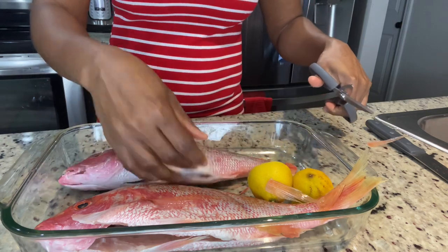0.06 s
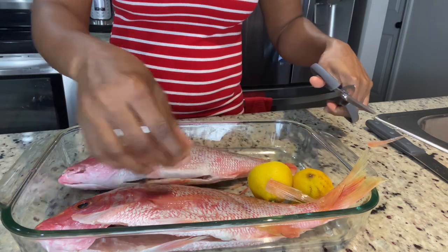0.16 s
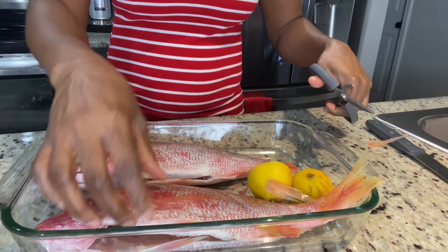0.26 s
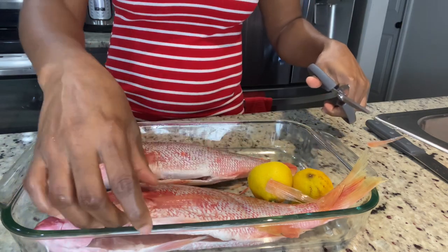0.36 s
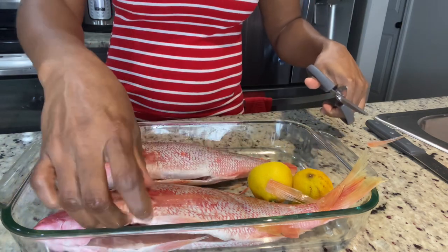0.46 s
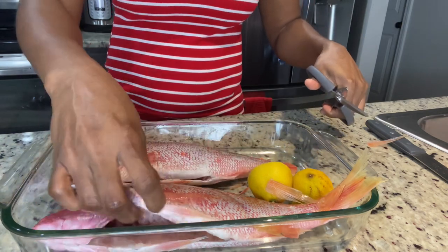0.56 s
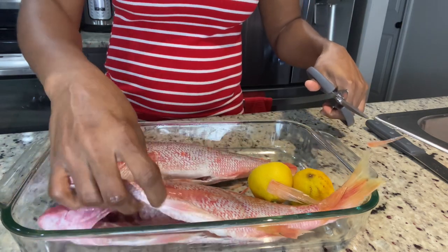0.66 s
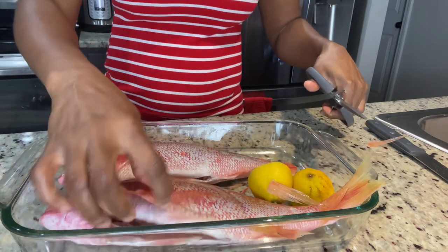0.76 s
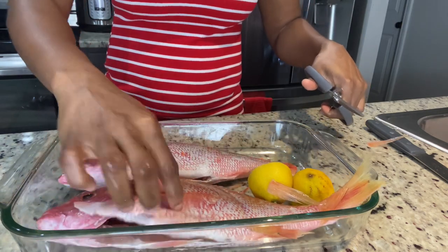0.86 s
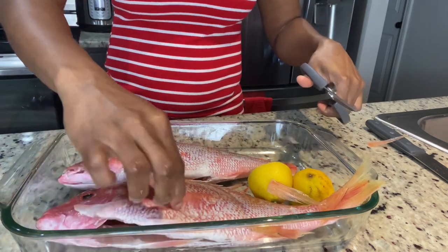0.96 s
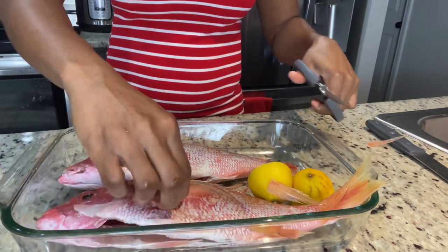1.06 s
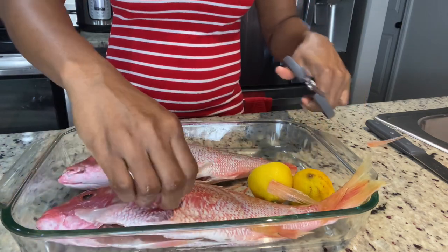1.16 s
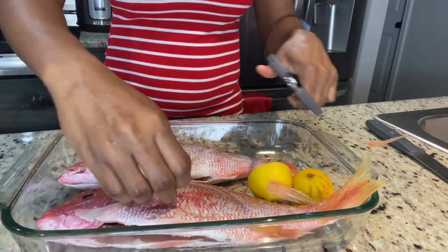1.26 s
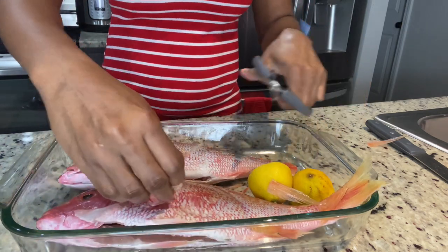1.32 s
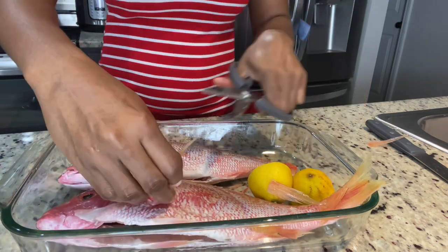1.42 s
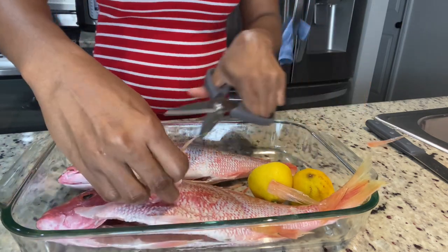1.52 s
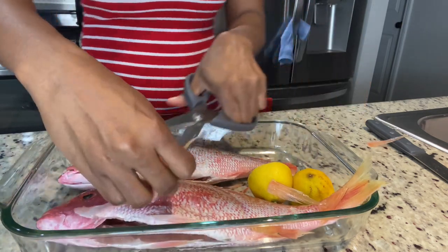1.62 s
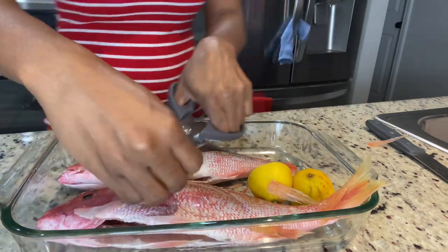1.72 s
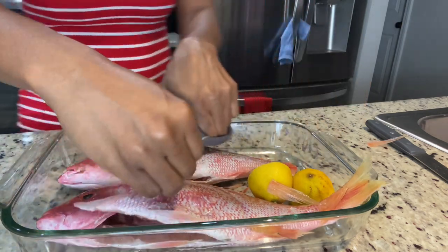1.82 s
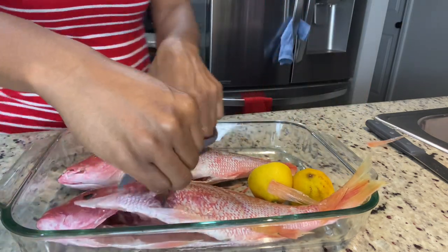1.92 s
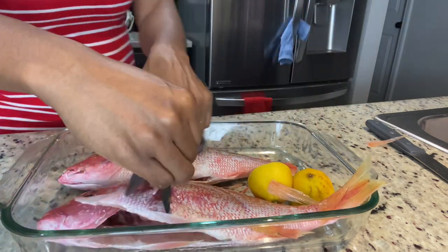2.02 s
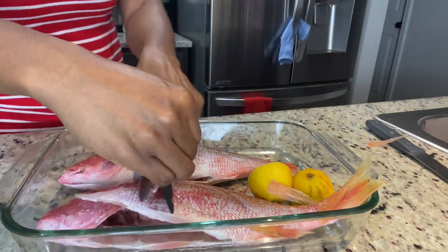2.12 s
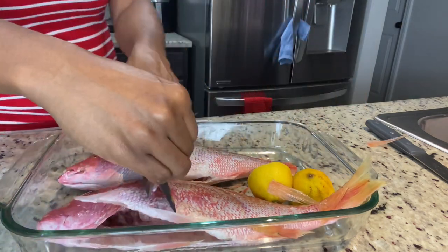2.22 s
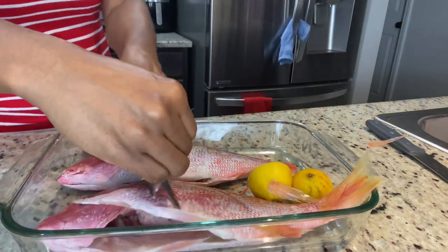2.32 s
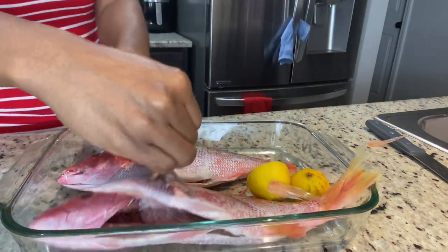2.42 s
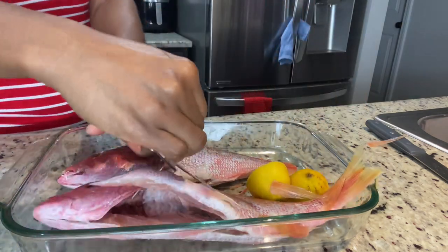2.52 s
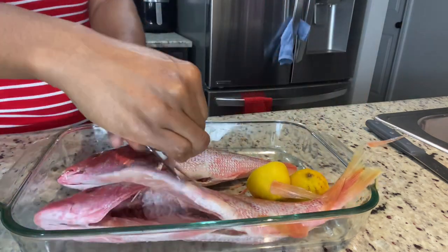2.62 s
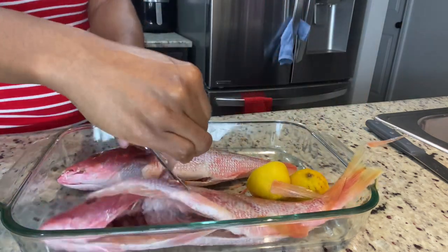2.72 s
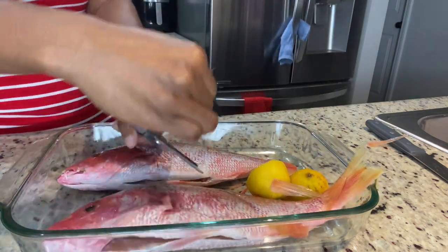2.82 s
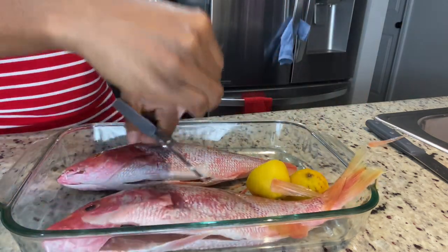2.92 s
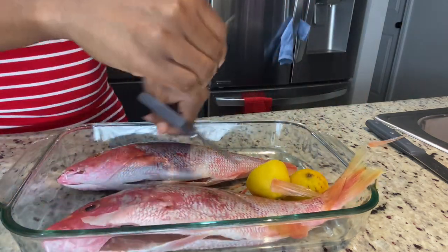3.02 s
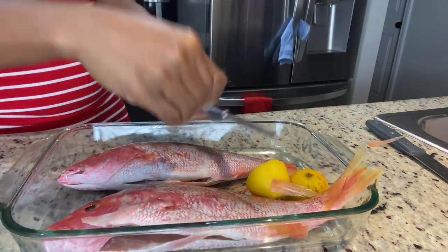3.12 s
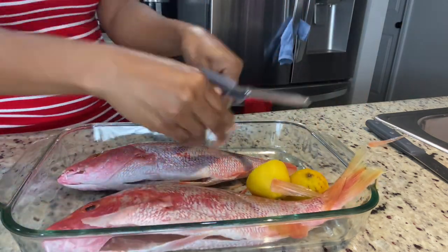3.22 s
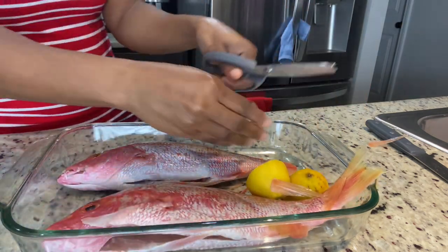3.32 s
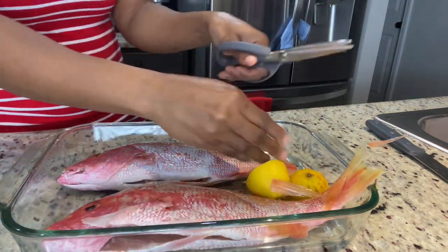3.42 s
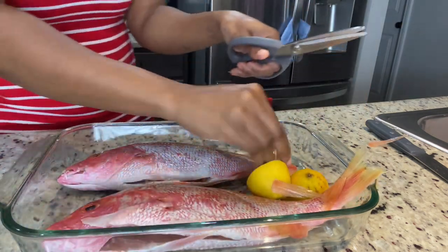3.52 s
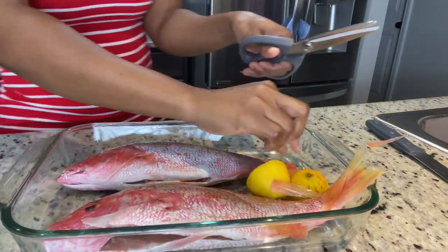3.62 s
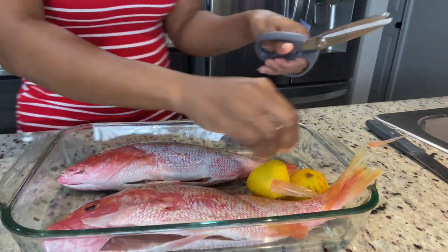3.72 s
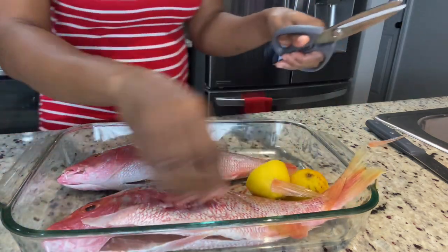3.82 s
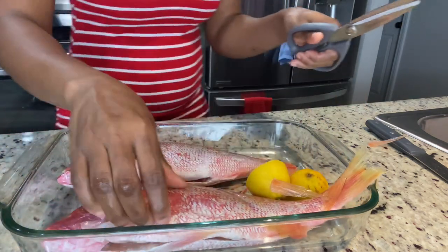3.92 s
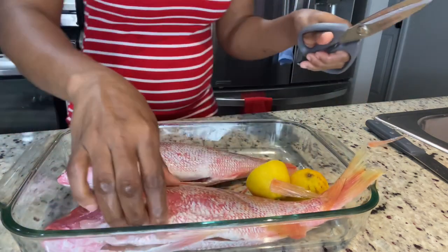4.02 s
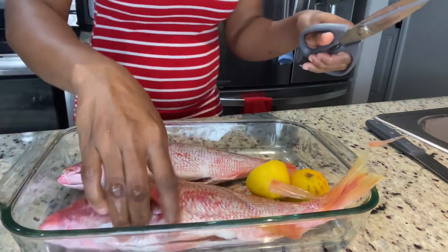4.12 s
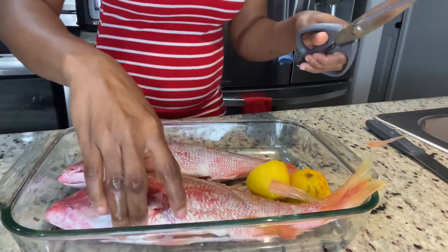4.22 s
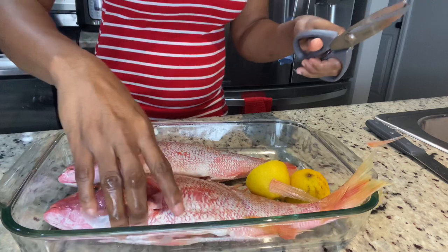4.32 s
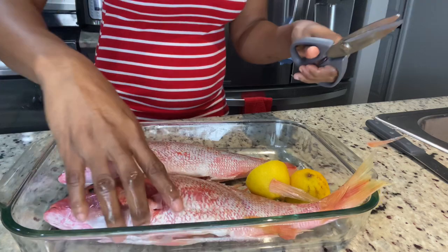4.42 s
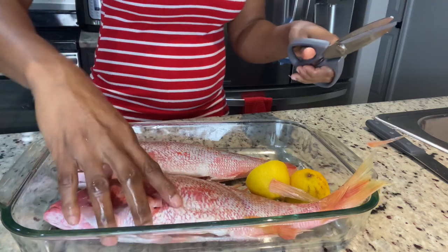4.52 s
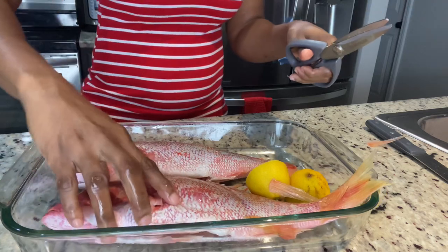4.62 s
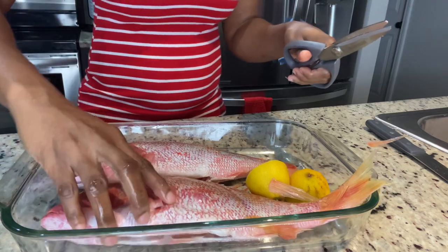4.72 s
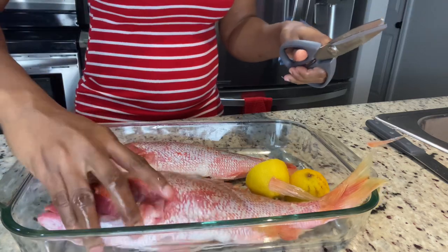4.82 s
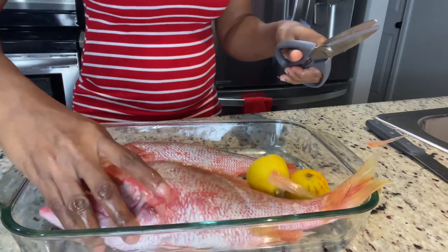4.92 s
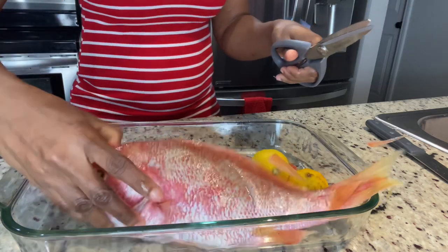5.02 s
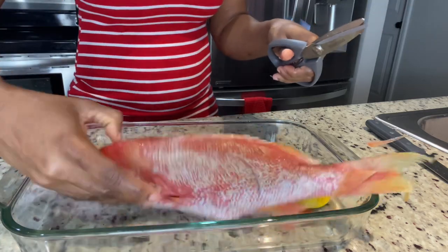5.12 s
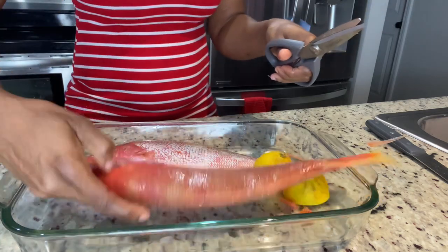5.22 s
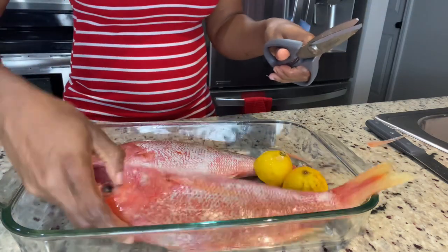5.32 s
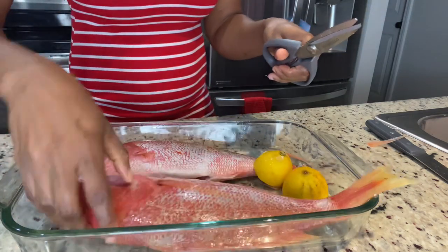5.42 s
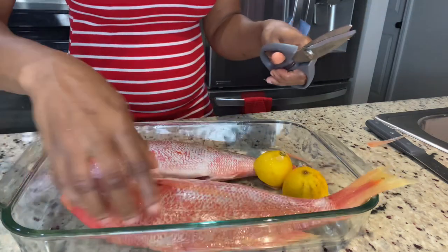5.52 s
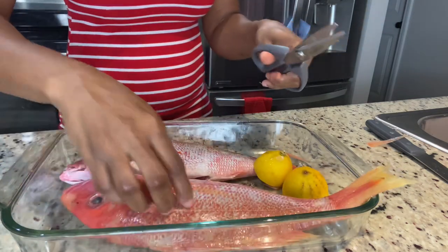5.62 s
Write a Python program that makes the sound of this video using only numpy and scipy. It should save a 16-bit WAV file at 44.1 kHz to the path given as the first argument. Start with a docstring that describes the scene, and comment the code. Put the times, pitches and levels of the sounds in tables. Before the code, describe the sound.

Wet fish skin squishes and scales tick softly while a glass dish bumps lightly on a stone counter. Kitchen shears then make one crisp, crunchy cut through a fin, followed at once by two loud, ringing glass knocks with low thuds. More quiet, slippery handling leads to a last squelch and knock as the fish lands. The microphone is close, in a hard-walled kitchen with a faint fridge hum.

```python
"""A glass dish knocks and rocks on a stone counter as hands turn wet fish in it and shears cut one fin.
Each knock sets glass and stone ringing, and the flesh lands with low thuds. The blades grind and the
fin rays snap; scales tick, and wet skin hisses and squelches under the fingers.
It all plays close up, in a hard-walled kitchen where a fridge hums."""
import sys
import numpy as np
from scipy import signal
from scipy.fft import rfft, irfft
from scipy.io import wavfile
from scipy.ndimage import uniform_filter1d

SR = 44100
rng = np.random.default_rng(int(sys.argv[2]) if len(sys.argv) > 2 else 0)


def transcribe(signal):
    """Save signal, clipped to [-1, 1], as a 16-bit WAV file at the path in sys.argv[1]."""
    frames = np.atleast_2d(signal).T
    limited = np.clip(frames, -1, 1)
    pcm = np.round(limited * 32767).astype(np.int16)
    wavfile.write(sys.argv[1], SR, pcm)


N = 249708


def undb(db):
    """Gain for a level in dB."""
    return 10 ** (np.asarray(db) / 20)


def unit(x):
    """Scales x to rms 1."""
    return x / np.sqrt(np.mean(x ** 2))


def band(x, hz, octaves, order=2):
    """Band-pass around hz."""
    edges = np.minimum(hz * 2 ** (np.array([-.5, .5]) * octaves), SR * np.array([.44, .48]))
    return signal.sosfilt(signal.butter(order, edges, "band", fs=SR, output="sos"), x)


def rolloff(x, hz, kind="low", order=2):
    """Low-pass or high-pass with its corner at hz."""
    return signal.sosfilt(signal.butter(order, hz, kind, fs=SR, output="sos"), x)


def equalise(x, curve):
    """Colours x along a curve of (Hz, dB) points."""
    hz, db = np.transpose(curve)
    freqs = np.maximum(np.fft.rfftfreq(x.shape[-1], 1 / SR), 1)
    return irfft(rfft(x) * undb(np.interp(np.log(freqs), np.log(hz), db)), x.shape[-1])


def fade(t60, seconds):
    """Exponential decay, 60 dB down after t60 seconds."""
    return np.exp(-np.log(1000) * np.arange(int(seconds * SR)) / SR / max(t60, .002))


def add(out, start, x):
    """Mixes x into out from start, in seconds."""
    i = int(start * SR)
    out[..., i:i + x.shape[-1]] += x[..., :N - i]


def place(x, pan_db, lag):
    """Stereo position: the left is pan_db louder, the right comes lag samples later."""
    return np.array([x * undb(pan_db / 2), np.roll(x, lag) * undb(-pan_db / 2)])


def wander(per_s):
    """Drift of rms 1, gliding to a new random value per_s times a second."""
    step = int(SR / per_s)
    return unit(uniform_filter1d(np.repeat(rng.standard_normal(N // step + 1), step), step)[:N])


def grains(per_s, spread_db):
    """Random clicks with a long tail of sizes, rms 1."""
    hit = rng.random(N) < per_s / SR
    return unit(hit * rng.standard_normal(N) * undb(spread_db * rng.exponential(size=N)))


def ring(modes, seconds, variation=1):
    """Stereo ring of a struck body; each blow varies the level, phase and pitch of its modes."""
    t = np.arange(int(seconds * SR)) / SR
    hz, db, t60 = np.transpose(modes)[:, :, None]
    level_jitter, phase_jitter, pitch_jitter = variation * rng.standard_normal((len(hz), 3)).T[..., None]
    hz = hz * (1 + .0047 * pitch_jitter)
    envelope = undb(db + 1.5 * level_jitter) * np.exp(-np.log(1000) * t / t60) * np.minimum(t / .0022, 1)
    right_lag_s = .00015
    phase = np.pi * hz * right_lag_s + .72 * np.minimum(hz / 700, 1) * phase_jitter  # bass stays narrow
    return np.array([np.sum(envelope * np.sin(2 * np.pi * hz * t + k * phase), axis=0) for k in (1, -1)])


def fridge():
    """The motor hums in wavering tones, the higher ones wider in stereo."""
    # Each row: pitch in Hz, level in dB.
    tones = [(177.6, -71.5), (253.0, -87), (414.5, -93.5), (592.2, -81.5), (769.8, -82), (829.0, -75.5),
             (5120, -94), (7150, -91.5)]
    t = np.arange(N) / SR
    hum = np.zeros((2, N))
    for hz, db in tones:
        level = np.sqrt(2) * undb(db + 3.3 * wander(4.2))
        stereo_phase = np.array([[0], [min(hz / 400, 2)]])
        hum += level * np.sin(2 * np.pi * hz * t + 1.5 * wander(23) + stereo_phase)
    return hum


def room_tone():
    """A soft bed of air noise, mostly low rumble."""
    # Each row: frequency in Hz, relative level in dB.
    colour = [(18, -31.5), (30, 0), (179, -8), (336, -6.5), (512, -19.5), (822, -16.5), (913, -22.5),
              (1390, -32), (5900, -40.5), (7270, -34), (9220, -37), (10200, -64.5), (11700, -39),
              (13300, -45), (16000, -71)]
    # Each row: frequency in Hz, likeness of left and right from 0 to 1.
    stereo_likeness = [(60, 0.41), (130, 0.94), (290, 0.71), (640, 0.37), (1410, 0.62), (3100, 0.45),
                       (6820, 1), (15000, 1)]
    hz, likeness = np.transpose(stereo_likeness)
    freqs = np.maximum(np.fft.rfftfreq(N, 1 / SR), 1)
    likeness = np.clip(np.interp(np.log(freqs), np.log(hz), likeness), -.95, .95)
    mid, side = (irfft(rfft(rng.standard_normal(N)) * np.sqrt(1 + k * likeness), N) for k in (1, -1))
    air = unit(equalise(np.array([mid + side, mid - side]), colour))
    return undb(-64 + .2 * wander(4.1)) * air


def kitchen_reverb(send):
    """Hard walls return a short tail that dies band by band, narrower in the bass."""
    # Each row: band centre in Hz, t60 in seconds.
    decays = [(150, 0.44), (500, 0.29), (1500, 0.49), (4000, 0.15), (10000, 0.12)]
    t = np.arange(int(.6 * SR)) / SR
    tail = np.zeros((2, len(t)))
    for hz, t60 in decays:
        width = min(hz / 450, 1)
        noise = np.array([[1, width], [1, -width]]) @ rng.standard_normal(tail.shape) / np.hypot(1, width)
        tail += fade(t60, .6) * band(noise, hz, 3.04, order=1)
    tail *= np.clip((t - .004) / .0048, 0, 1)  # pre-delay, then fade-in
    tail /= np.sqrt(np.sum(tail[0] ** 2))
    return signal.fftconvolve(send.mean(axis=0)[None], tail, axes=1)[:, :N]


def finger_pressure(gestures):
    """Envelope of the grip: each gesture swells, holds and lets go."""
    attack_s, swell_share, release_t60 = .023, .28, .076
    pressure = np.zeros(N)
    for start, length, db in gestures:
        t = np.arange(int(length * SR)) / SR
        held = np.minimum(t / max(attack_s, swell_share * length), 1)
        add(pressure, start, undb(db) * np.concatenate([held, held[-1] * fade(release_t60, .3)]))
    return pressure


def wet_skin():
    """Sliding fingers raise a grainy hiss and squish; wet pockets pop as flesh is gripped or lands."""
    # Each row: start in seconds, length in seconds, hiss in dB, squish in dB.
    strokes = [(0.007, 0.016, -56, -68.5), (0.482, 0.015, -74, -67), (0.522, 0.035, -65, -69),
               (0.594, 0.07, -73.5, -71), (0.939, 0.02, -62, -98), (1.033, 0.047, -59.5, -95),
               (1.09, 0.065, -65.5, -95), (1.316, 0.086, -70, -77.5), (1.402, 0.092, -64, -75),
               (1.603, 0.19, -77.5, -74), (1.861, 0.36, -64.5, -69.5), (2.218, 0.022, -60, -60),
               (2.323, 0.056, -71, -73), (2.385, 0.054, -64.5, -77), (3.578, 0.022, -72.5, -79),
               (3.87, 0.17, -72, -77.5), (3.994, 0.372, -68.5, -72.5), (4.293, 0.14, -68.5, -91),
               (4.75, 0.072, -86, -78.5), (4.844, 0.18, -64, -69), (5.031, 0.19, -65.5, -70),
               (5.212, 0.046, -54.5, -56.5), (5.245, 0.031, -58, -51.5), (5.283, 0.067, -63.5, -72),
               (5.582, 0.07, -78.5, -88.5)]
    # Each row: start in seconds, length in seconds, level in dB.
    squelches = [(0.489, 0.023, -64.5), (0.522, 0.054, -63.5), (0.614, 0.04, -82), (0.675, 0.022, -64),
                 (0.736, 0.043, -71.5), (1.656, 0.094, -74.5), (2.312, 0.11, -72.5), (4.027, 0.24, -70.5),
                 (4.883, 0.13, -68), (5.128, 0.057, -66), (5.245, 0.033, -48.5), (5.3, 0.024, -71)]
    # The pitch in Hz of each size of wet pocket.
    pocket_pitches = (480, 720, 930, 1150)
    hiss = finger_pressure(np.array(strokes)[:, [0, 1, 2]]) * undb(1.3 * (wander(40) + wander(14)))
    squish = finger_pressure(np.array(strokes)[:, [0, 1, 3]]) * undb(2.5 * wander(30))
    pops = unit(sum(band(grains(per_s=200, spread_db=2), hz, .3) for hz in pocket_pitches))
    out = np.zeros((2, N))
    for channel in out:
        channel += hiss * unit(band(grains(per_s=9000, spread_db=1.3), 7000, 1.9))
        channel += squish * unit(band(grains(per_s=2500, spread_db=1.5), 1500, 2.4))
    return out + finger_pressure(squelches) * pops


def scale_ticks():
    """Scales and spines flick under the fingers in tiny bright cracks."""
    # Each row: start in seconds, level in dB, centre in Hz, pan to the left in dB.
    ticks = [(0.036, -49, 4170, 12), (0.332, -56.5, 6860, 4), (0.3546, -56, 2570, 7), (0.543, -55, 3600, 0),
             (0.627, -62, 3500, 0), (0.856, -48, 5800, 3), (0.93, -56, 7840, -5), (0.9475, -55, 5250, 19),
             (0.965, -46.5, 4900, -6), (0.969, -43, 8800, 0), (1.0407, -46.5, 5400, -5),
             (1.048, -42.5, 7640, 7), (1.0725, -40.5, 7700, -5), (1.0797, -41, 7100, 3),
             (1.115, -48.5, 8150, -2.0), (1.1414, -50, 8200, -2), (1.256, -57, 8100, 5),
             (1.9527, -49, 8300, 3), (1.9918, -52, 4370, -4), (2.1815, -43, 8000, -5),
             (2.209, -48, 8260, -1.0), (2.235, -34, 8360, -1.0), (2.317, -53.5, 7250, -7),
             (2.364, -48.5, 8200, -1), (2.4214, -41, 9600, -2), (2.43, -54, 7700, 13),
             (2.5473, -39.5, 3700, 9), (2.569, -39.5, 7040, -9), (2.59, -37, 7200, 1),
             (3.244, -62, 7940, 1.5), (3.3345, -57, 7730, 13.5), (3.6046, -59.5, 4070, 3),
             (3.932, -50.5, 8400, 5.5), (4.2383, -59.5, 4630, 0.0), (4.315, -49.5, 5960, 2),
             (4.327, -34.5, 5500, -9), (4.445, -58, 8490, 0), (4.7453, -67.5, 3000, 4),
             (4.763, -66, 3420, 2), (4.813, -63, 3570, 0.5), (4.8552, -47, 7400, 1), (4.871, -45, 8800, -1),
             (4.8897, -50.5, 3700, 4), (4.9375, -46.5, 3500, 1.0), (5.242, -43, 3000, 6),
             (5.247, -40, 7850, 0), (5.2661, -39, 3020, 0.0), (5.3827, -49, 7260, 0.5)]
    out, t = np.zeros((2, N)), np.arange(SR // 10) / SR
    envelope = fade(t60=.023, seconds=.1) * np.minimum(t / .00076, 1)
    for start, db, hz, pan_db in ticks:
        noise = rng.standard_normal(len(t))
        sparkle = .22 * unit(band(noise, 5300, 1.4)) + .35 * unit(band(noise, 13000, .35))
        tick = (unit(band(noise, hz, .68)) + sparkle) * envelope
        add(out, start, place(undb(db) * tick / np.abs(tick).max(), pan_db, lag=0))
    return out


def flesh_thuds():
    """Heavy flesh drops in the dish: a low, damped thud that sags in pitch."""
    # Each row: start in seconds, level in dB, opening pitch in Hz, t60 in seconds.
    drops = [(0.233, -47.5, 200, 0.15), (0.252, -46.5, 193, 0.083), (0.748, -42, 158, 0.064),
             (2.754, -31.5, 147.9, 0.085), (3.097, -33.5, 149, 0.066), (3.868, -51.5, 204, 0.096),
             (3.894, -44.5, 235, 0.083), (4.328, -59, 232.4, 0.075), (5.257, -34, 146.7, 0.1)]
    out, t = np.zeros(N), np.arange(SR // 5) / SR
    for start, db, hz, t60 in drops:
        envelope = undb(db) * np.minimum(t / .0046, 1) * fade(t60, .2)
        add(out, start, envelope * np.sin(2 * np.pi * hz * t * (1 - .92 * t)))
    return place(out, pan_db=-1.6, lag=4)


def shears():
    """Stick-slip grains and snapping rays ring blades and fin; the dish takes up the push."""
    # The blades grinding. Each row: time in seconds, level in dB.
    grind_curve = [(2.602, -77), (2.619, -34.5), (2.662, -34.5), (2.668, -39), (2.687, -37.5), (2.693, -46),
                   (2.752, -45.5), (2.76, -67)]
    # Fin rays snapping. Each row: start in seconds, level in dB, upper crack in Hz, t60 in seconds,
    # sheen offset in dB, lower crack in Hz, its offset in dB.
    snaps = [(2.6121, -33.5, 6360, 0.019, -8.5, 3100, -8), (2.618, -25, 7124, 0.035, -3, 3500, -10),
             (2.6343, -26.5, 7640, 0.023, -3.5, 4400, -5.5), (2.638, -28, 8300, 0.02, -2, 4700, -4),
             (2.647, -27, 8450, 0.019, -1, 4560, -2), (2.6577, -28.5, 8290, 0.011, -3, 4500, -4.5),
             (2.673, -29, 5284, 0.024, -8, 2600, -1.5), (2.68, -34.5, 6500, .016, -4, 2720, -0.5),
             (2.685, -25, 7970, .016, -4, 3320, 1.5), (2.7122, -29, 7525, 0.018, 3, 3470, -1),
             (2.7317, -33, 6455, 0.046, 2, 3270, 0)]
    # Resonances of fin and blades. Each row: centre in Hz, nominal width in Hz, relative level in dB.
    resonances = [(2800, 630, -5), (4300, 30, -2), (6340, 28, -3), (6930, 40, 4), (7170, 60, 3),
                  (7900, 50, 2.5), (8520, 35, 3), (9140, 40, -4)]
    cut_start_s, crack_width_hz = 2.5, 800
    t = np.arange(N) / SR
    force = undb(np.interp(t, *np.transpose(grind_curve), left=-120, right=-120) + 2.5 * wander(250))
    cracks, sheen_level = np.zeros(N), force * undb(-2)
    for start, db, high_hz, t60, sheen_db, low_hz, low_db in snaps:
        burst = undb(db) * fade(t60, .1) * np.minimum(t[:SR // 10] / .0014, 1)
        add(force, start, burst)
        add(sheen_level, start, burst * undb(sheen_db))
        for hz, crack_db in ((high_hz, 1), (low_hz, low_db)):
            noise = band(rng.standard_normal(len(burst)), hz, crack_width_hz / hz / np.log(2))
            add(cracks, start, burst * undb(crack_db) * unit(noise))
    rub = grains(per_s=12000, spread_db=.99)
    fin_ring, blade_ring = (
        unit(sum(undb(db) * band(rub, hz, 2 * width / hz + .0081, order=1)
                 for hz, width, db in resonances if low < hz < high))
        for low, high in ((2000, 5000), (5000, 10000)))
    blade = force * unit(blade_ring + 3.7 * unit(band(rub, 7600, .55)))
    sheen = sheen_level * unit(band(rub, 13050, .4))
    grit = force * unit(fin_ring + 2 * unit(band(rub, 3700, 2.5)))
    body = force * unit(unit(band(rub, 1200, 2.2)) + .3 * unit(band(rub, 697, .08, order=1)))
    # The cut darkens as the blades close on thicker rays.
    closing_s = np.clip(t - cut_start_s, 0, .14)
    grit *= undb(-18.5 + 80 * closing_s)
    body *= undb(-26.5 + 110 * closing_s)
    return place(blade + sheen, 1, lag=-4) + place(cracks + grit, .88, lag=-2) + place(body, 4, lag=9)


def stone_counter(knock_pulses):
    """The slab booms under the dish's knocks and the dull bumps of a hand or hip."""
    # Each row: start in seconds, push in dB.
    bumps = [(0.256, -57), (0.741, -59), (2.629, -45), (2.68, -61.5), (2.716, -46.5), (3.552, -49.5),
             (5.12, -44.5)]
    # Each row: pitch in Hz, relative level in dB, t60 in seconds.
    slab_modes = [(78.3, -6.5, 0.19), (149, 5, 0.045), (241.4, -7.5, 0.13)]
    push = knock_pulses.copy()
    for start, db in bumps:
        add(push, start, undb(db) * np.hanning(int(.011 * SR)))
    push = rolloff(push, 62, "high")
    slab = ring(slab_modes, seconds=.55, variation=.12)
    return undb(-34.5) * signal.fftconvolve(push[None], slab, axes=1)[:, :N]


def dish_knocks():
    """Glass hits stone. Returns the rough contact tone, the crack and the ring of dish and counter."""
    # Each row: start in seconds, level in dB, contact pitch in Hz, contact length in seconds,
    # then offsets in dB for the counter push, the crack and the dish's body, wall, lip and rim.
    knocks = [(0.231, -40.5, 847, 0.0069, -22, -5, -11, -19, -14, -12.5),
              (0.248, -41, 880, 0.0079, -1.5, -5, -15, -19, -15.5, -21),
              (0.289, -51.5, 854, 0.006, -13, -12, -15, -9.5, -10, -6.5),
              (0.7362, -50.5, 770, 0.0029, 0.5, -20, -8, -9.5, -19, -32),
              (0.742, -51, 990, 0.0032, -5, -12, -11, -19, -5.5, -16),
              (0.7662, -56.5, 694, 0.002, -11, 11.5, -13, -26, -24, -8),
              (1.693, -49.5, 710, 0.0025, -7, -7, -6.5, -17, -24, -24),
              (2.317, -59, 990, 0.0077, -3, 6, -25, -14, -4, -4),
              (2.568, -61, 580, 0.0024, -38, 23, -2.5, 1, -4, -1),
              (2.736, -38, 689, 0.016, -30, -30, -10, -20, -30.5, -37),
              (2.7491, -12, 960, 0.0034, -18.5, -15, -18, -23, -24.5, -18.5),
              (2.7531, -14, 924, 0.0075, -27, -25, -21.5, -30, -22.5, -30),
              (3.0691, -13.5, 1485, 0.0051, -22, -18, -15, -15.5, -14, -17.5),
              (3.092, -18, 898, 0.0038, -15.5, -18.5, -13, -17.5, -18.5, -22),
              (3.0975, -20.5, 910, 0.0039, -25, -35, -15.5, -15, -30.5, -33.5),
              (3.137, -37, 1544, 0.031, -25.5, -40, -12.5, -13, -23, -40),
              (3.8658, -33.5, 760, 0.0042, -19.5, -3.5, -15.5, -11, -18.5, -9),
              (3.8663, -36, 2860, 0.016, -41, -30, -36.5, -33, -41.5, -23),
              (3.8915, -40, 710, 0.0045, -12, -30, -15.5, -11.5, -18, -24),
              (4.326, -41, 1290, 0.0043, -31, 12, -14.5, -9, -12.5, -38),
              (5.102, -50.5, 524, 0.008, 3.5, -30.5, -21.5, -34.5, -32, -32),
              (5.124, -52, 615, 0.0072, -11, -35, -2, -28, -35, -35),
              (5.162, -53.5, 646, 0.013, -21, -26, -0.5, -6.5, -18, -14),
              (5.238, -48.5, 1540, 0.014, 3, -13, -2.5, 1, -7, -0.5),
              (5.251, -26.5, 590, 0.0029, -4.5, -32, -14.5, -17.5, -29.5, -28),
              (5.259, -30, 800, 0.0062, -9, -25, -17, -24, -23, -25)]
    # Each row: pitch in Hz, relative level in dB.
    glass_modes = [(310, -11.5), (420, -17.5), (590, -2.5), (697, 3), (764, -9.5), (845, -12), (926, -7),
                   (1023, -9.5), (1240, -6), (1400, -9), (1485, -2.5), (1570, 1), (2160, 2), (2550, 0),
                   (2840, 0.5), (2985, -4.5), (3700, -4.5), (4400, -6), (4715, -9), (5600, -9.5)]
    # The borders in Hz between the modes of body, wall, lip and rim.
    part_borders = (1150, 1800, 2700)
    mode_hz, mode_db = np.transpose(glass_modes)
    mode_t60 = .097 * (1000 / mode_hz) ** .43  # the wet load chokes higher modes sooner
    mode_part = np.digitize(mode_hz, part_borders)
    (contact, cracks, pulses), glass = np.zeros((3, N)), np.zeros((2, N))
    t = np.arange(SR // 8) / SR
    for start, db, hz, length, push_db, crack_db, *part_db in knocks:
        rough = unit(band(rng.standard_normal(len(t)), 1000, 1.7))
        bright = unit(band(rng.standard_normal(len(t)), 4200, 2.6))
        # The contact swells, holds, and is choked as the dish settles.
        hold = np.sin(np.pi / 2 * np.minimum(t / .001, 1)) ** 2 * np.exp(-(t / length) ** 5)
        tone = .81 * np.sin(2 * np.pi * hz * t) + .086 * rough
        crack = .5 * np.minimum(t / .0015, 1) * np.exp(-t / .0035) * bright
        add(contact, start, undb(db) * (tone * hold + .2 * rough * np.exp(-t / .012)))
        add(cracks, start, undb(db + crack_db) * crack)
        add(pulses, start, undb(db + push_db) * np.hanning(int(.0021 * SR)))
        struck = np.column_stack([mode_hz, mode_db + np.take(part_db, mode_part), mode_t60])
        add(glass, start, undb(db) * ring(struck, seconds=.18))
    counter = stone_counter(pulses)
    # Chatter on the stone roughens the lower ring.
    chatter = .64 * wander(260) * rolloff(glass, part_borders[2])
    return place(contact, 3.5, lag=9), place(cracks, 1, lag=2), glass + chatter + counter


def scene():
    """Everything at the dish feeds the kitchen reverb; fridge and room tone are already diffuse."""
    contact, cracks, ringing = dish_knocks()
    handling = scale_ticks() + wet_skin() + shears()
    thuds = flesh_thuds()
    # The rocking dish swings its ring about, so the walls get it blurred, and mostly its lower part.
    blurred = ringing * (1 + .7 * wander(500))
    dull = rolloff(blurred + thuds + undb(-4) * contact, 2603)
    send = undb(-11) * dull + undb(-5.5) * cracks + undb(-6) * handling
    direct = contact + cracks + ringing + thuds + handling
    return direct + kitchen_reverb(send) + fridge() + room_tone()


def record(dry):
    """The sound loses its deep bass, has a narrow dip in the treble near 10 kHz and no very top."""
    # Each row: frequency in Hz, gain in dB.
    tone_curve = [(100, 4.5), (8500, -2), (9700, -7.5), (10400, -26), (11100, -7), (12500, 0),
                  (14200, -4.5), (15500, -19)]
    heard = rolloff(equalise(dry, tone_curve), 56, "high", order=4)
    return signal.sosfilt(signal.ellip(10, .2, 80, 16350, fs=SR, output="sos"), heard)


dry = scene()
out = record(dry)
transcribe(out)
```